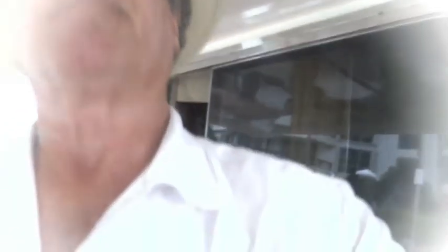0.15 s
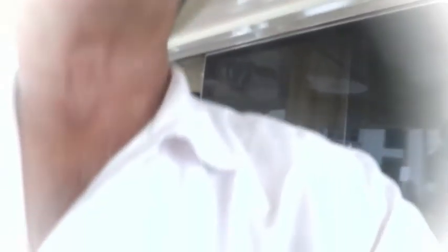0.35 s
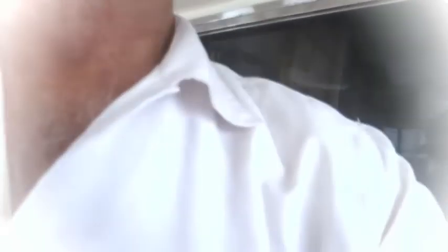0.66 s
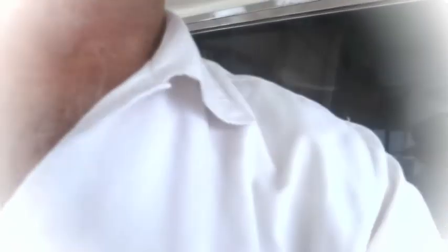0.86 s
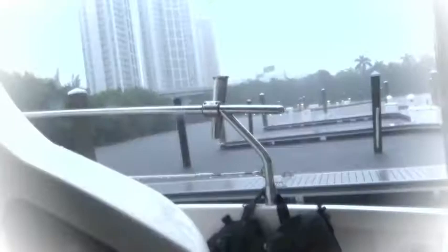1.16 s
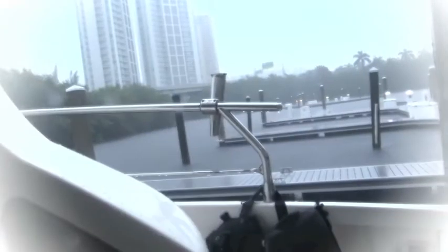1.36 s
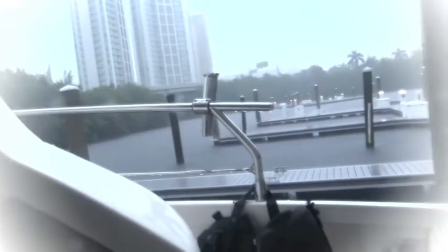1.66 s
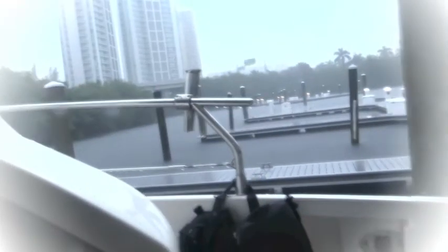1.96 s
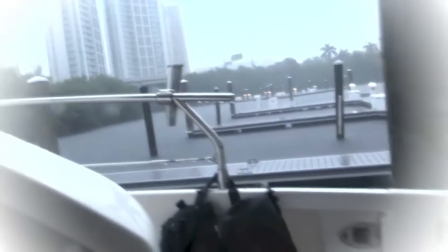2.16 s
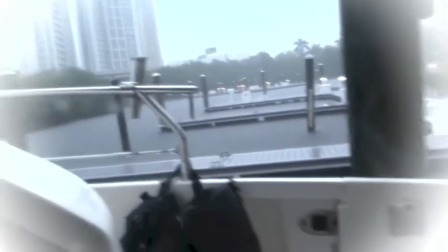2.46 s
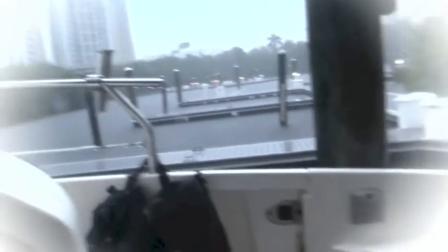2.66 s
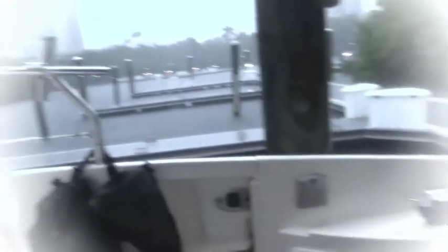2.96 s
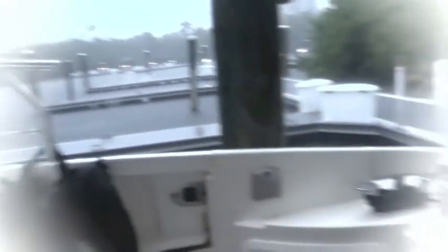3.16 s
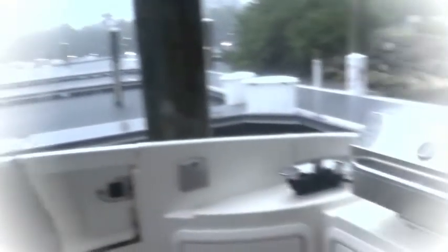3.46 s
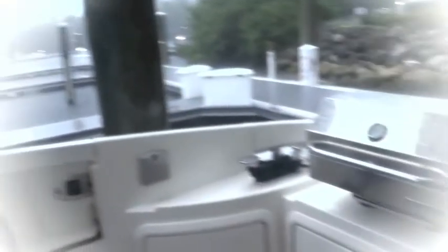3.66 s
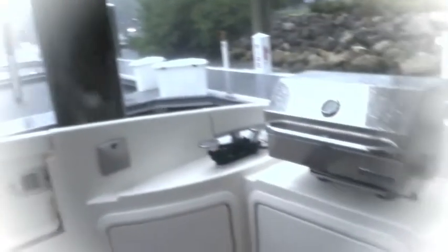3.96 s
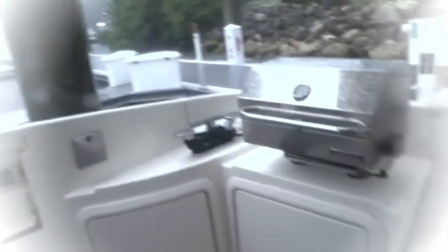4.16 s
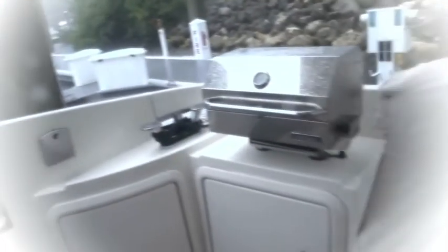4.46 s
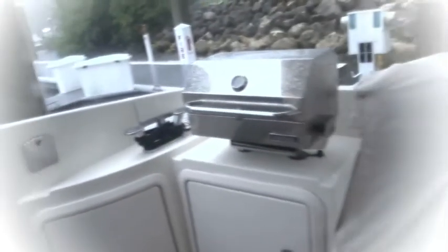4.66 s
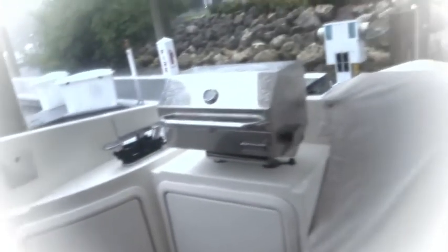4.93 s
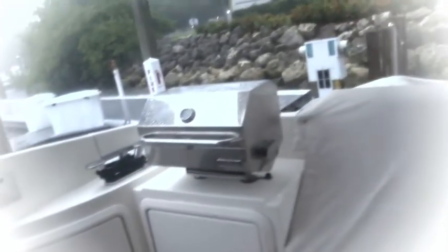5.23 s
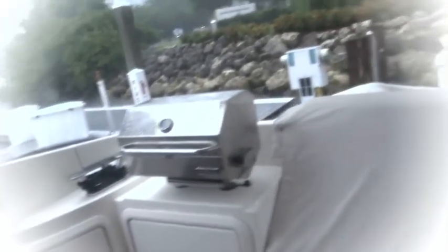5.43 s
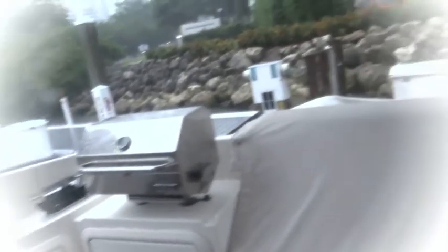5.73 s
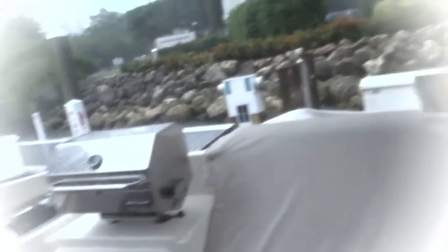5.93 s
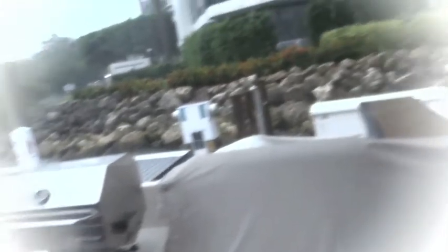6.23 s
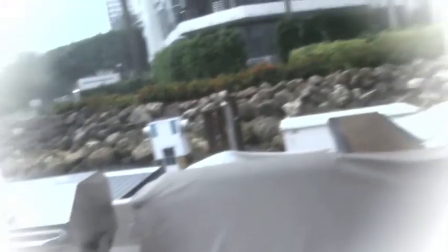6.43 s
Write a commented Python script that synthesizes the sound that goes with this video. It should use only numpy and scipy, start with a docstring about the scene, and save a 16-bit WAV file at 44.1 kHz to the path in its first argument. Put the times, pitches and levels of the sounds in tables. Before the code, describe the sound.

Dull knock, then dense heavy rain roaring overhead on a moored boat; a brief gap, then softer hissing downpour with a few close drips splatting.

```python
"""Torrential rain on a moored boat: first loud under the hard top, then quieter and fizzier by the open deck.
The rain is shaped noise in layers: hard surfaces roar, panels drum, splashes fizz and the hull rumbles.
In each layer a steady blur of far drops is mixed with the separate hits of nearer ones.
A few big drips splat close by, and one dull knock opens the scene.
The roof part fades and is cut; after a short near-silence the deck part rises."""
import sys
import numpy as np
from scipy import signal
from scipy.fft import rfft, irfft, next_fast_len
from scipy.io import wavfile
from scipy.ndimage import uniform_filter1d, map_coordinates

SR = 44100
rng = np.random.default_rng(int(sys.argv[2]) if len(sys.argv) > 2 else 0)


def waveform_to_disk(signal):
    """Save audio, clipped to [-1, 1], as 16-bit WAV at the path in sys.argv[1]."""
    frames = np.transpose(np.atleast_2d(signal))
    scaled = np.clip(frames, -1, 1) * 32767
    samples = np.round(scaled).astype(np.int16)
    wavfile.write(sys.argv[1], SR, samples)


N = 290619  # length in samples

# Colours of the rain layers. Each row: frequency in Hz, relative level in dB per Hz.
ROOF_ROAR_COLOUR = [(290, -41), (500, -14.5), (600, -10.5), (649, -7.5), (687, -7), (944, -2), (1290, -2.5),
                    (1470, -1.5), (2040, 0), (2860, -6.5), (3970, -18), (5000, -28), (6500, -51),
                    (11000, -120)]
ROOF_DRUM_COLOUR = [(65, -48), (110, -11), (183, -4.5), (232, -0.5), (269, -3.5), (350, 1), (442, -0.5),
                    (532, -10), (600, -7), (780, -49), (1320, -120)]
ROOF_FIZZ_COLOUR = [(2500, -48), (4300, -2), (5400, 0), (7200, -0.5), (9400, -7), (11700, -12.5),
                    (14000, -16), (15000, -21), (15600, -32)]
DECK_ROAR_COLOUR = [(290, -38), (500, -13), (700, -8), (1000, -5), (1500, -4), (2200, -3), (2800, -5),
                    (3500, -11), (3950, -14.5), (4400, -17.5), (5000, -22.5), (6500, -58), (11000, -120)]
DECK_DRUM_COLOUR = [(65, -42), (110, -11), (183, -2), (260, -2), (340, -0.5), (480, -4), (650, -9),
                    (900, -11), (1300, -32), (2000, -120)]
DECK_FIZZ_COLOUR = [(2500, -31), (4300, -4.5), (5400, -6), (7000, -4.5), (9000, -5.5), (10200, -11),
                    (12500, -13), (14000, -17), (15000, -24), (15600, -24)]
# Colour of the hull's rumble. Each row: frequency in Hz, relative level in dB per Hz.
RUMBLE_COLOUR = [(15, -60), (30, -36), (50, -17), (70, -7.5), (100, -2), (140, 3), (180, -14), (310, -120)]
# Stereo width. Each row: frequency in Hz, left-right difference over sum in dB.
ROOF_WIDTH = [(60, -24), (95, -39), (150, -49), (240, -54), (380, -45), (600, -16), (950, -8.5), (1500, -7),
              (2380, -9.5), (3770, 2.5), (5980, -0.5), (9470, -3.5), (15000, -11)]
DECK_WIDTH = [(60, -31), (95, -34), (150, -40), (240, -43), (380, -16.5), (600, -5), (950, -1.5),
              (1500, -3), (2380, -7.5), (3770, 1), (5980, -0.5), (9470, -4), (15000, -22)]
# Stereo lead. Each row: frequency in Hz, share of the difference that comes from left leading (-1 to 1).
ROOF_LEAD_SHARE = [(300, 0.01), (1600, .3), (3000, .05), (5000, .01)]
DECK_LEAD_SHARE = [(300, 0.01), (600, 0.13), (1300, -.05), (2700, -.2), (4000, -.3), (6000, .05)]
# Stereo balance. Each row: frequency in Hz, left over right in dB.
ROOF_BALANCE = [(60, 0), (200, 0.1), (380, 0.2), (700, -1.3), (1290, 0.2), (2380, -0.5), (4400, 0.42),
                (8120, 0.5), (15000, 1.0)]
DECK_BALANCE = [(60, 0), (200, 0.1), (380, -1.7), (700, 1.7), (1290, 1.0), (2380, 1.2), (4400, 1.7),
                (8120, 0.5), (15000, 0.0)]
# Drift of the low end in each part. Each row: time in seconds, rumble level in dB, drumming level in dB.
ROOF_LOW_LEVELS = [(0.15, -34, -22.5), (0.75, -47, -23), (0.95, -41, -23), (1.08, -45, -23)]
DECK_LOW_LEVELS = [(1.4, -43, -34), (2.5, -47, -33.5), (3.3, -43.5, -30.5), (3.65, -53, -36.5),
                   (4.4, -52.5, -36.5), (5.0, -52, -33), (5.75, -45.5, -31.5), (6.2, -52.5, -32.5)]
# Big drips close by. Each row: start in seconds, spit level in dB, spit frequency in Hz, slap level in dB,
# left over right in dB, hold before the decay in seconds.
BIG_DRIPS = [(0.9263, -27.5, 7270, -17, 0.1, .002), (1.3364, -27.5, 9500, -34, 7, .002),
             (1.434, -34, 6000, -27, 1.1, .003), (3.272, -29.5, 7640, -25, 2.1, .003),
             (3.7623, -33, 9190, -24, 3, .002), (5.2957, -29, 9200, -19, 3, 0.01),
             (5.312, -38, 9200, -22, 1.1, 0.0082), (6.2517, -34, 7380, -31, 1.1, .005),
             (6.2724, -31, 7570, -33, 0.6, .003), (6.5655, -29.5, 9220, -33, 0.1, .002)]
# The opening knock. Its one row: length in seconds, level in dB, first and last frequency in Hz.
DULL_KNOCK = (.021, -10, 225, 150)
# Roof fade. Its one row: start, would-be silence and early cut, all in seconds.
ROOF_FADE = (1.075, 1.19, 1.1605)
# Faint tail after that cut. Its one row: level in dB, time to fall 60 dB in seconds.
ROOF_TAIL = (-33, .055)
# Deck fade. Its one row: would-be silence, full level, late entry and softening of that entry, all in seconds.
DECK_FADE = (1.19, 1.3, 1.2, .008)

ROOF_ROAR_DB, ROOF_FIZZ_DB = -11.5, -31.5  # mean levels of the downpour
DECK_ROAR_DB, DECK_FIZZ_DB = -20.5, -32.5
ROAR_FOLLOWS = 0.16  # dB of roar per dB of drumming
DRIP_ATTACK_S, DRIP_T60_S = 0.00083, 0.045  # attack time constant, time to fall 60 dB
SPRAY_HZ, SPRAY_DB = 6400, 2  # broad spray around each spit, its level over the spit
SLAP_HZ = 2880
TOP_HZ = 15600  # band limit


def amp(db):
    """Gain of a level in dB."""
    return 10 ** (np.asarray(db) / 20)


def unit(x):
    """x scaled to an rms of 1."""
    return x / np.sqrt(np.mean(x ** 2) + 1e-20)


def along(points, hz):
    """Values of a frequency curve, read on a log axis."""
    point_hz, values = np.transpose(points)
    return np.interp(np.log(hz + 1), np.log(point_hz + 1), values)


def curves(rows):
    """One value per sample for each column after the time."""
    times, *columns = np.transpose(rows)
    return [np.interp(np.arange(N) / SR, times, column) for column in columns]


def wobble(rate):
    """A smooth random curve with rate knots a second."""
    knots = rng.standard_normal(int(N * rate / SR) + 4)
    return map_coordinates(knots, [np.arange(N) * rate / SR])


def filtered(x, response):
    """x shaped by a complex response over frequency."""
    size = next_fast_len(N + 8192)
    spectrum = rfft(x, size) * response(np.fft.rfftfreq(size, 1 / SR))
    return irfft(spectrum, size)[..., :N]


def impacts(count, spread_db, life_s):
    """Envelope of count drops a second of random size, each a sharp start and an exponential decay of energy."""
    total = int(count * N / SR)
    when, size = rng.random((total, 2)).T
    energy = amp(-spread_db * np.log(size + 0.027)) ** 2  # the offset limits the largest drops
    hits = np.bincount((when * N).astype(int), energy, N)
    return np.sqrt(signal.lfilter([1], [1, -np.exp(-1 / (life_s * SR))], hits))


def patter(near, patchy_db, drops):
    """Two unrelated noises: a far blur with drifting patches, plus near drops with the share near of the power."""
    far = signal.stft(rng.standard_normal((2, N)), nperseg=512)[2]
    patches = rng.standard_normal(far.shape[1:])
    patches = uniform_filter1d(patches, size=8, axis=0)  # smooth over frequency
    patches = uniform_filter1d(patches, size=10, axis=1)  # smooth over time
    blur = signal.istft(far * amp(patchy_db * unit(patches)), nperseg=512)[1][:, :N]
    hits = drops * rng.standard_normal((2, N))
    return np.sqrt(1 - near) * unit(blur) + np.sqrt(near) * unit(hits)


def in_stereo(pair, colour, stereo):
    """One noise is the sum of left and right; their difference mixes its quarter-turned copy with the other."""
    width, lead, balance = stereo

    def difference_response(hz):
        share = along(lead, hz)
        return amp(along(colour, hz) + along(width, hz)) * [1j * share, np.sqrt(1 - share ** 2)]

    middle = filtered(pair[0], lambda hz: amp(along(colour, hz)))
    side = filtered(pair, difference_response).sum(0)
    both = np.array([middle + side, middle - side]) / np.std(middle)
    return filtered(both, lambda hz: amp(np.array([[0.5], [-0.5]]) * along(balance, hz)))


def surface_roar(level_db, colour, ticks, stereo):
    """Drops on hard surfaces: mid-band noise, nearly all far blur with a few short ticks."""
    return amp(level_db) * in_stereo(patter(near=0.036, patchy_db=0.74, drops=ticks), colour, stereo)


def panel_drumming(level_db, colour, thumps, stereo):
    """Panels under the drops: low noise pulsed by slower-dying thumps."""
    return amp(level_db) * in_stereo(patter(near=0.14, patchy_db=1, drops=thumps), colour, stereo)


def splash_fizz(level_db, colour, ticks, stereo):
    """Splashes: high noise, the patchiest layer and the one with most near drops."""
    return amp(level_db) * in_stereo(patter(near=0.23, patchy_db=1.4, drops=ticks), colour, stereo)


def big_drips():
    """Each drip is a bright spit with spray and a duller slap on the deck, both dying fast."""
    out = np.zeros((2, N + SR))
    t = np.arange(SR // 5) / SR
    hz = np.fft.rfftfreq(len(t), 1 / SR)

    def band(centre_hz, width):
        """Noise around centre_hz, width in natural-log units of frequency."""
        distance = np.log(hz / centre_hz + 1e-9) / width
        return unit(irfft(rfft(rng.standard_normal(len(t))) / (1 + distance ** 4)))

    for start_s, spit_db, spit_hz, slap_db, pan_db, held_s in BIG_DRIPS:
        decay = amp(-60 * np.maximum(t - held_s, 0) / DRIP_T60_S)
        envelope = decay * (1 - np.exp(-t / DRIP_ATTACK_S))
        spit = amp(spit_db) * (band(spit_hz, 0.12) + amp(SPRAY_DB) * band(SPRAY_HZ, 0.55))
        slap = amp(slap_db) * band(SLAP_HZ, 0.51)
        start = round(start_s * SR)
        out[:, start:start + len(t)] += (spit + slap) * envelope * amp([[pan_db / 2], [-pan_db / 2]])
    return out[:, :N]


def dull_knock():
    """One soft low bump at the very start, sinking in pitch, alike left and right."""
    length_s, level_db, first_hz, last_hz = DULL_KNOCK
    progress = np.clip(np.arange(N) / SR / length_s, 0, 1)
    phase = 2 * np.pi * np.cumsum(first_hz + (last_hz - first_hz) * progress) / SR
    return amp(level_db) * np.sin(np.pi * progress) * np.sin(phase)


def hull_rumble(level_db, thumps, stereo):
    """The hull under the rain: the lowest noise, with a share of thumps."""
    return amp(level_db) * in_stereo(patter(near=0.12, patchy_db=0.0, drops=thumps), RUMBLE_COLOUR, stereo)


def rain(low_levels, roar_mean_db, fizz_db, roar_colour, drum_colour, fizz_colour, stereo):
    """The downpour: roar, drumming and fizz swell slightly together over the hull's rumble."""
    rumble_db, drum_db = curves(low_levels)
    heard = slice(round(low_levels[0][0] * SR), round(low_levels[-1][0] * SR))
    roar_db = roar_mean_db + ROAR_FOLLOWS * (drum_db - drum_db[heard].mean())
    swell_db = 0.18 * wobble(4.39) + 0.056 * wobble(12)
    ticks = impacts(count=500, spread_db=1.5, life_s=0.0014)  # the same drops mark roar and fizz
    thumps = impacts(count=300, spread_db=1.5, life_s=0.015)  # the same drops mark drumming and rumble
    return (surface_roar(roar_db + swell_db, roar_colour, ticks, stereo)
            + panel_drumming(drum_db + swell_db, drum_colour, thumps, stereo)
            + splash_fizz(fizz_db + swell_db, fizz_colour, ticks, stereo)
            + hull_rumble(rumble_db, thumps, stereo))


def roof_gain():
    """Gain of the roof part: a linear fade cut early, then a faint dying tail."""
    t = np.arange(N) / SR
    start_s, silence_s, cut_s = ROOF_FADE
    tail_db, tail_t60_s = ROOF_TAIL
    after = t - cut_s
    tail = amp(tail_db - 60 * np.abs(after) / tail_t60_s)
    return np.where(after < 0, np.interp(t, [start_s, silence_s], [1, 0]), tail)


def deck_gain():
    """Gain of the deck part: a linear rise whose late entry is softened."""
    t = np.arange(N) / SR
    silence_s, full_s, entry_s, soften_s = DECK_FADE
    return np.interp(t, [silence_s, full_s], [0, 1]) * np.clip((t - entry_s) / soften_s, 0, 1)


def scene():
    """Rain under the roof, then by the deck, with big drips and the opening knock."""
    roof = rain(ROOF_LOW_LEVELS, ROOF_ROAR_DB, ROOF_FIZZ_DB, ROOF_ROAR_COLOUR, ROOF_DRUM_COLOUR,
                ROOF_FIZZ_COLOUR, (ROOF_WIDTH, ROOF_LEAD_SHARE, ROOF_BALANCE))
    deck = rain(DECK_LOW_LEVELS, DECK_ROAR_DB, DECK_FIZZ_DB, DECK_ROAR_COLOUR, DECK_DRUM_COLOUR,
                DECK_FIZZ_COLOUR, (DECK_WIDTH, DECK_LEAD_SHARE, DECK_BALANCE))
    return roof_gain() * roof + deck_gain() * deck + big_drips() + dull_knock()


def record(dry):
    """Peaks are clipped at full scale, with the band limit applied before and after."""
    limited = filtered(dry, lambda hz: hz < TOP_HZ)
    return filtered(np.clip(limited, -1, 1), lambda hz: hz < TOP_HZ)


dry = scene()
out = record(dry)
waveform_to_disk(out)
```